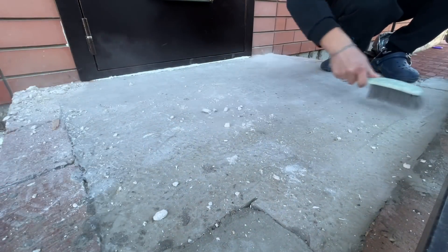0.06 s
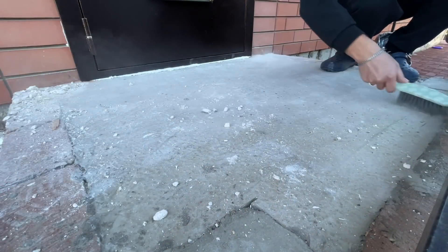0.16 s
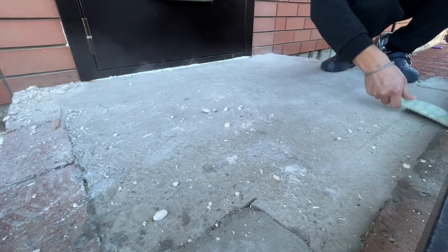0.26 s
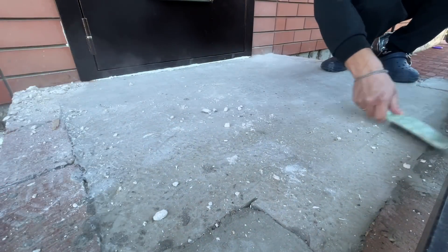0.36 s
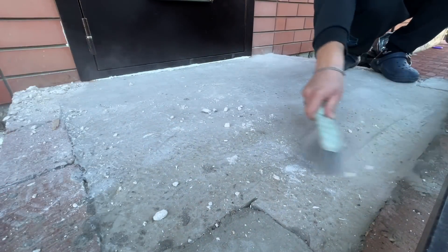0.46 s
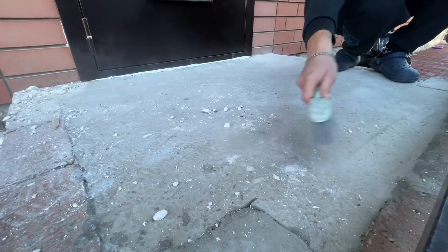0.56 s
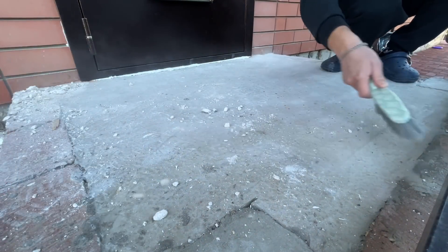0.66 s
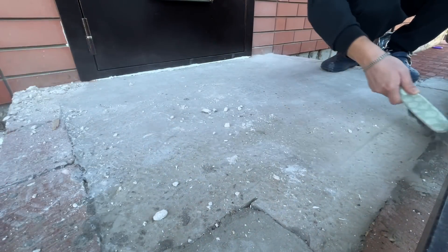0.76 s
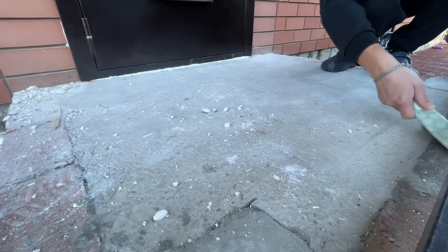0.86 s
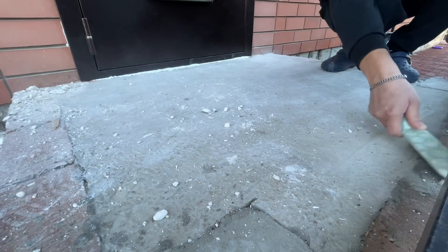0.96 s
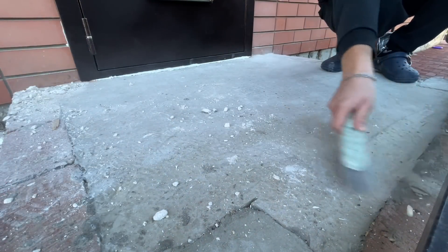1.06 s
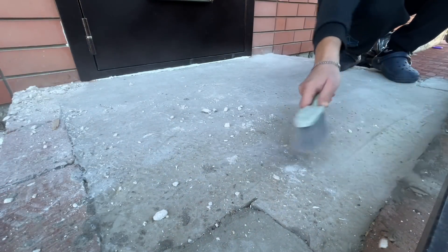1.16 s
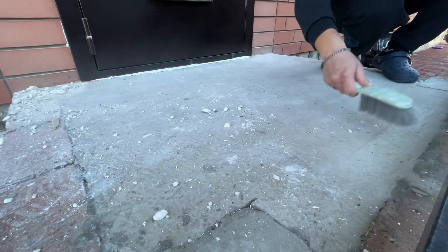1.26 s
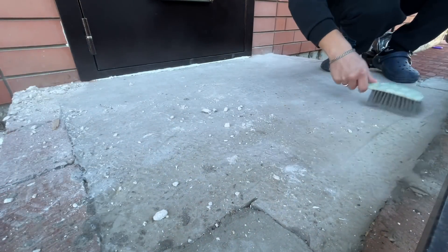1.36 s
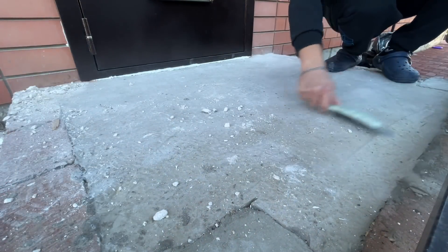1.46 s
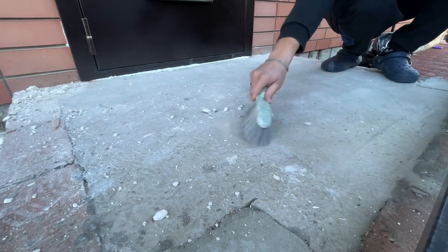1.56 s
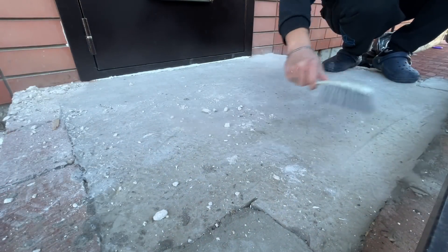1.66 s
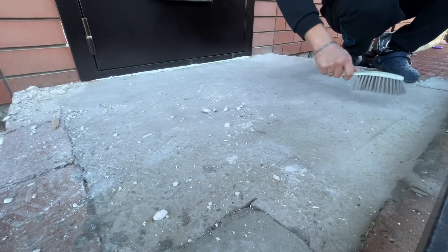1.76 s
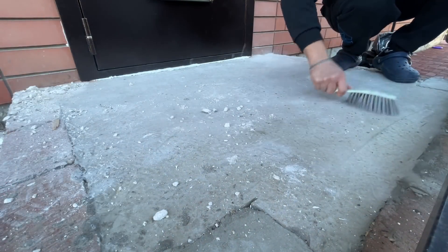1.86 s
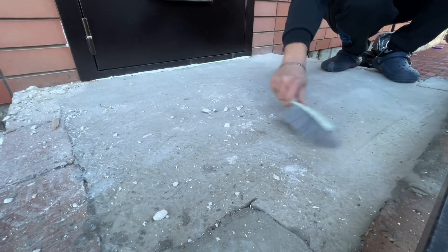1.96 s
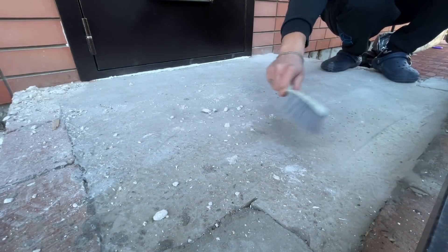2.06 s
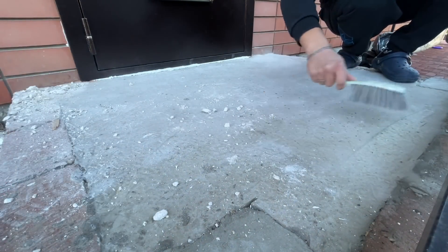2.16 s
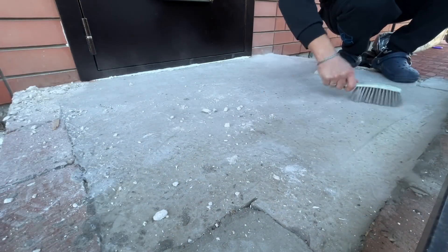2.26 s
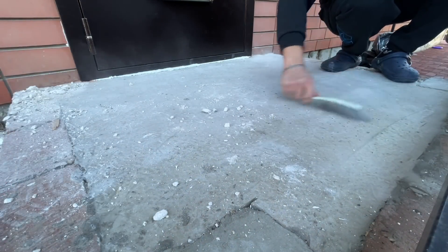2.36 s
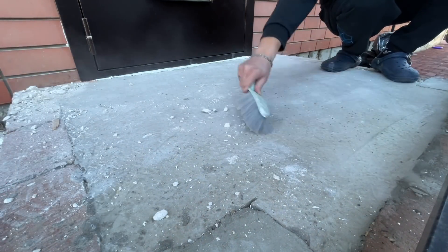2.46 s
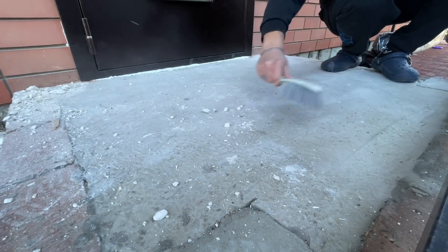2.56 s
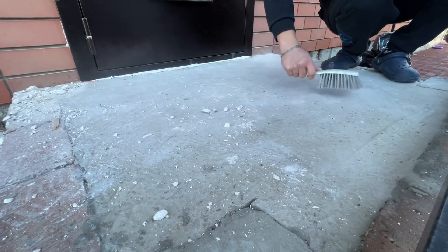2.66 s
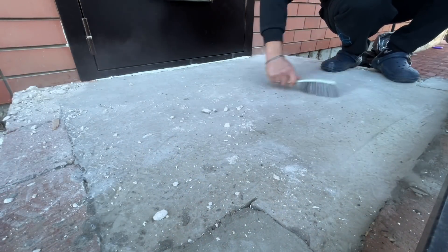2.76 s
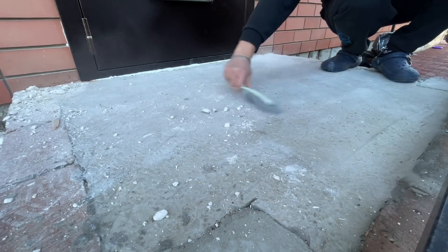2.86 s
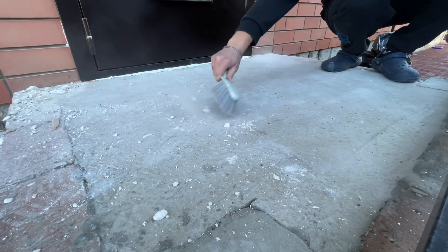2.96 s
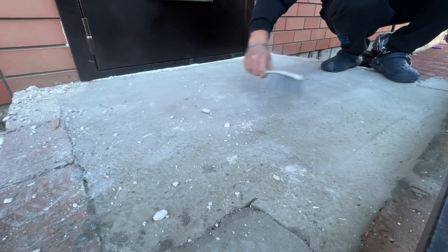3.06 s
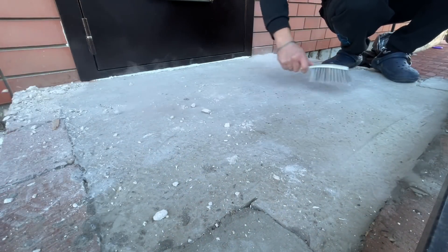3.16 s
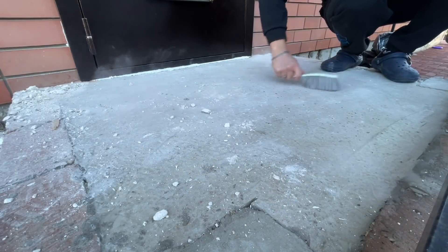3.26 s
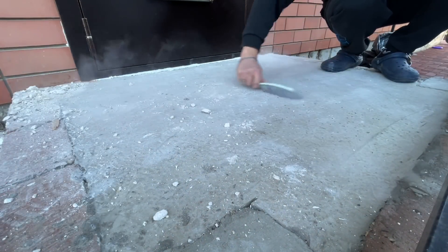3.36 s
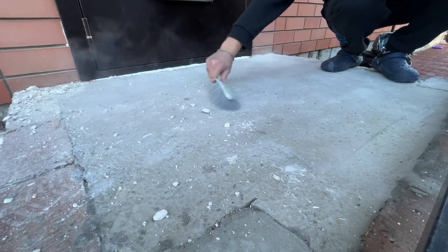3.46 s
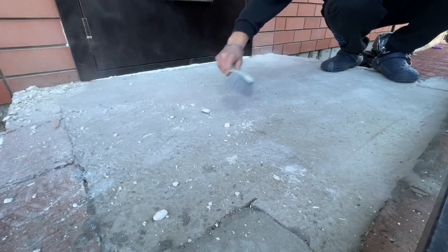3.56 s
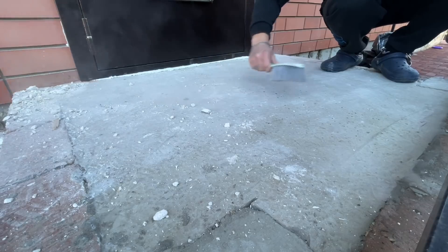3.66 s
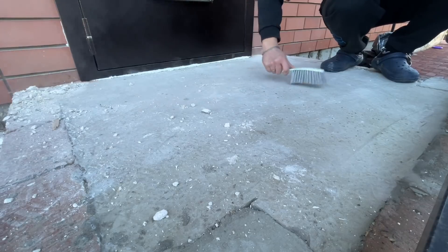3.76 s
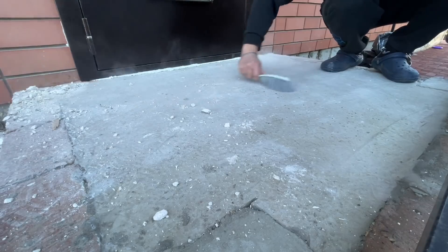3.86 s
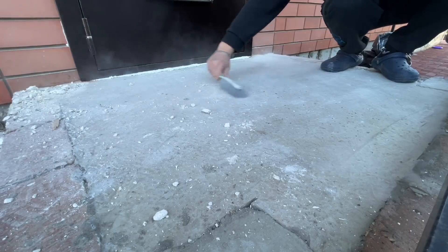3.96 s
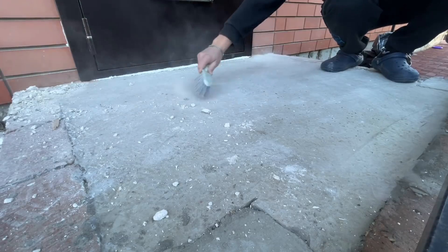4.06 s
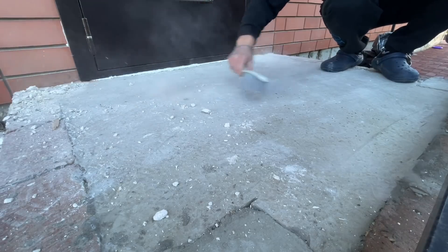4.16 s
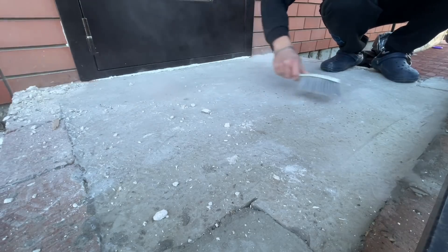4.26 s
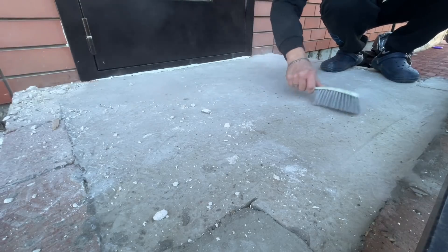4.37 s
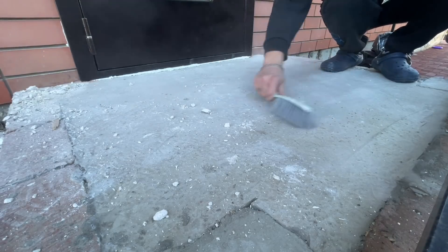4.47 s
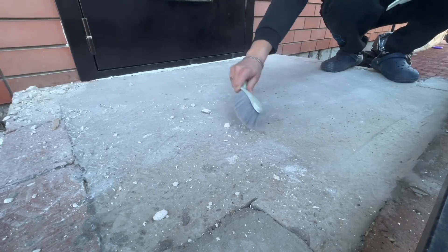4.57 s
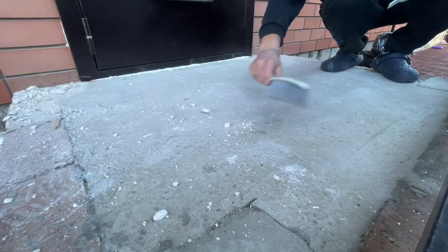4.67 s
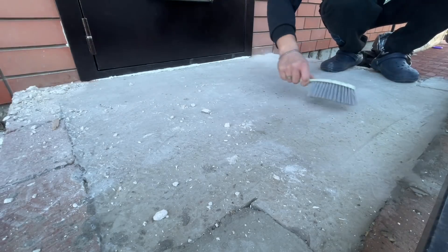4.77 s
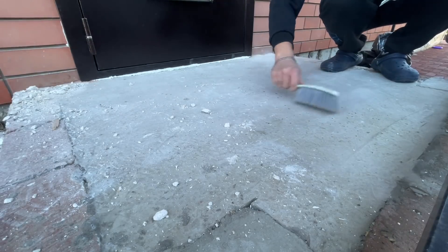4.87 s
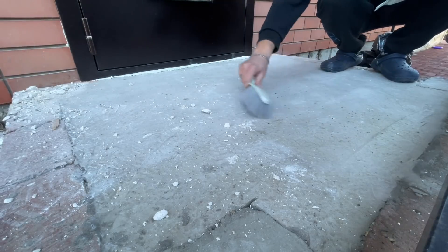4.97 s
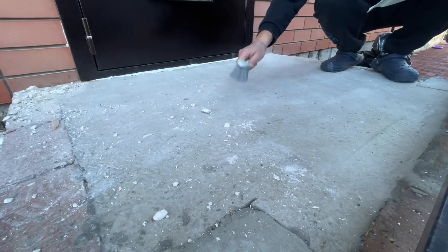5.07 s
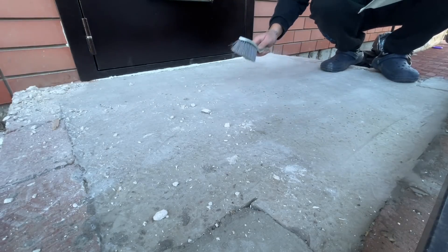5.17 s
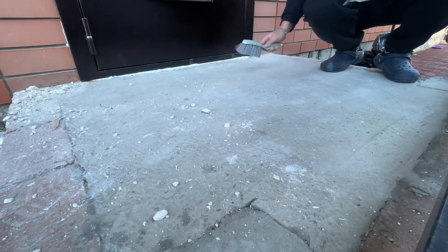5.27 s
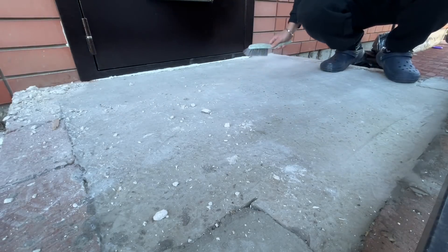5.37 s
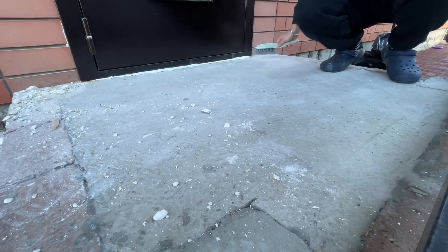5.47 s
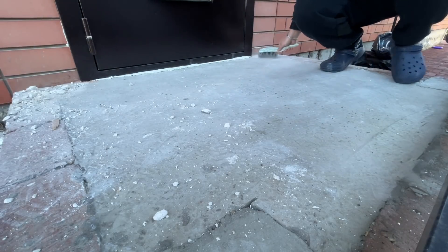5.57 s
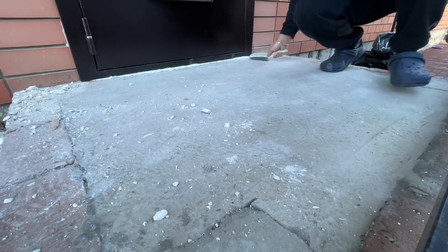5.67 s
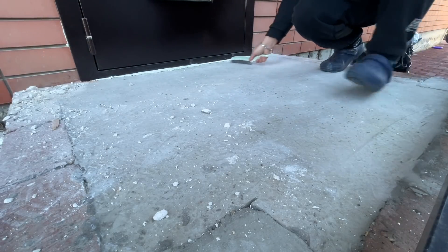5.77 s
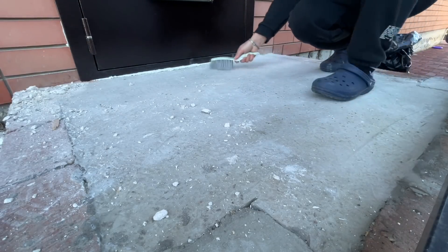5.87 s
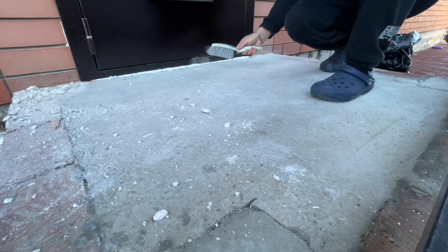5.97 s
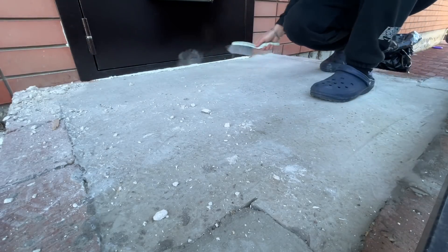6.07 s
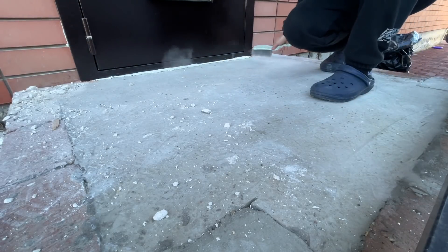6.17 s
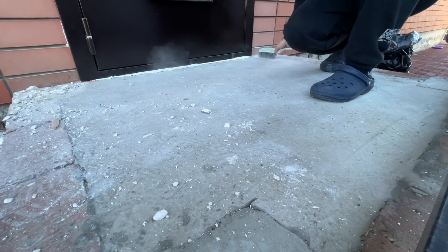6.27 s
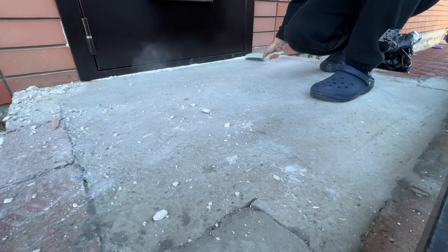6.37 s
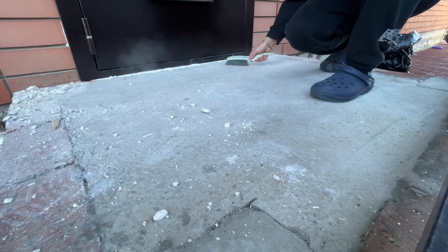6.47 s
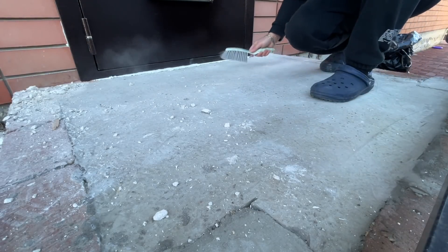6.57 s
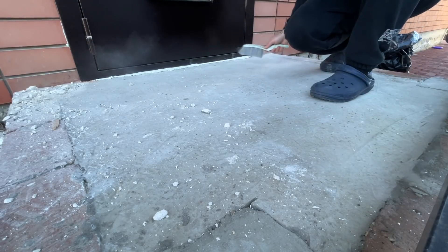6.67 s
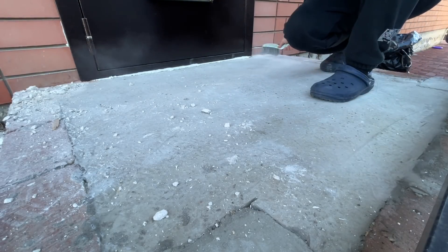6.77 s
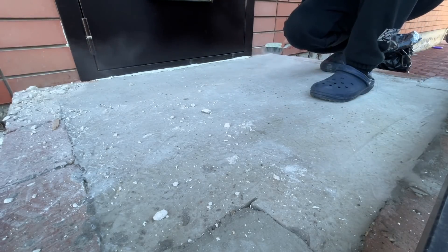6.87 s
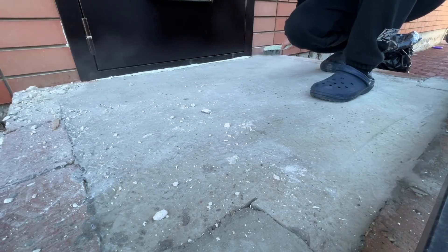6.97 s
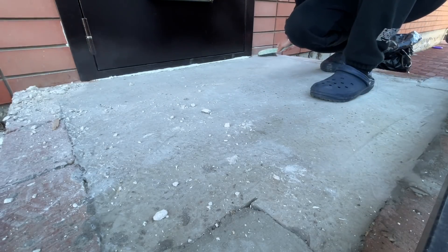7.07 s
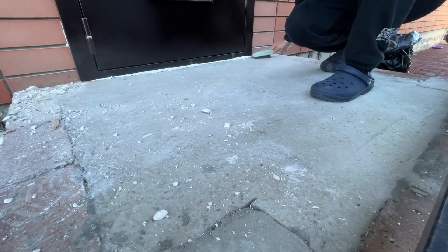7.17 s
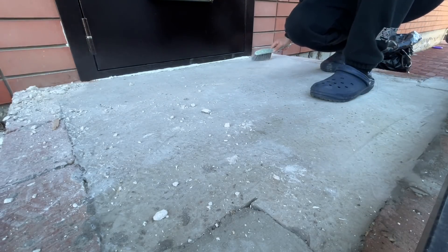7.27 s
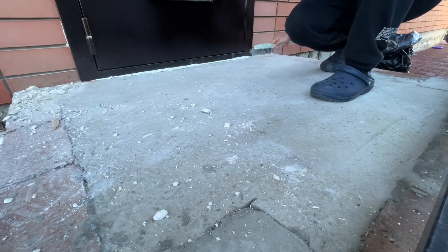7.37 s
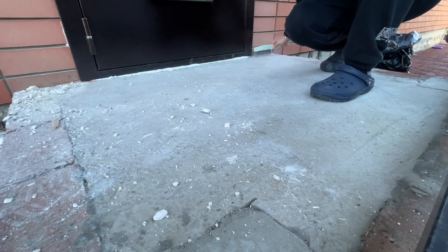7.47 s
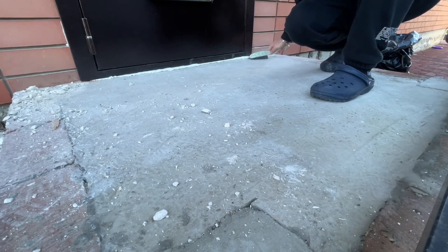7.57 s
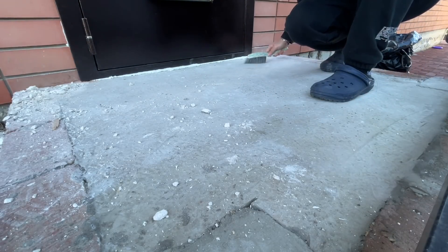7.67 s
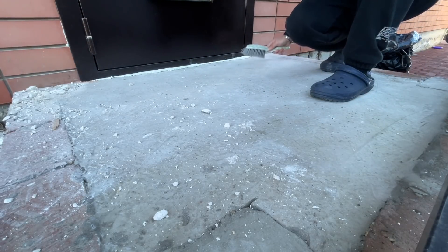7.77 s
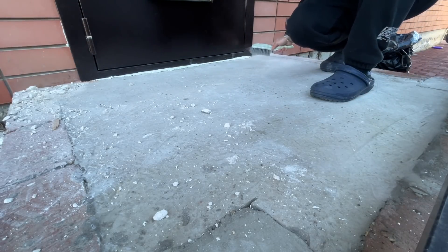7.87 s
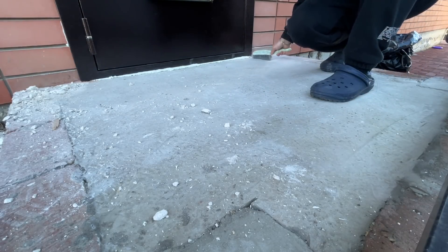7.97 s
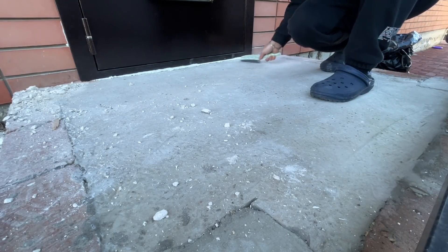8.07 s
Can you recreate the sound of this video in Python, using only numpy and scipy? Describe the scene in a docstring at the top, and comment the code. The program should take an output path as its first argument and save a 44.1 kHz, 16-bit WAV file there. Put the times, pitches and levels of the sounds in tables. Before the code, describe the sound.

Close, dry, bright swishes of a plastic hand brush on dusty concrete, roughly two per second, each landing with a light tap and small hollow knock. Fine grit ticks between strokes. After several firm strokes a shoe shifts softly, then the sweeping becomes fainter. Outdoor doorstep beside a door and brick wall, with a short close reflection, quiet low hum and distant rumble, picked up in stereo by a phone.

```python
"""Sweeping a concrete doorstep

A crouching person sweeps a dusty concrete doorstep with a plastic hand brush, about two strokes a second.
Each stroke lands with a tap made of fast-fading clicks and a knock in the modes of the handle. Dense random
clicks are the bristles flicking over the concrete, sparser ones the loose dust; short ringing ticks are grit.
A shoe shifts once. Door and brick wall answer with one close echo and a short tail, over a low hum and a
distant rumble, heard by a phone with two microphone ports."""
import sys
import numpy as np
from scipy import signal
from scipy.fft import rfft, irfft
from scipy.io import wavfile

SR = 44100
rng = np.random.default_rng(int(sys.argv[2]) if len(sys.argv) > 2 else 0)


def pcm_store(signal):
    """Save signal as 16-bit PCM."""
    levels = np.round(np.clip(np.atleast_2d(signal), -1, 1) * 32767)
    wavfile.write(sys.argv[1], SR, levels.astype(np.int16).T)


N = 358348
T = np.arange(N) / SR  # s
FREQ = np.maximum(np.arange(N // 2 + 1) * SR / N, 1)  # Hz


def undb(db):
    """Decibels to gain."""
    return 10 ** (np.asarray(db) / 20)


def unit(x):
    """Scale to rms 1."""
    return x / np.sqrt(np.mean(x ** 2))


def across(table, axis=1):
    """One column of a frequency table, joined on a log axis."""
    rows = np.array(table, float)
    return np.interp(np.log(FREQ), np.log(rows[:, 0]), rows[:, axis])


def curve(table):
    """Gain over time from rows of t/s, level/dB."""
    return undb(np.interp(T, *np.transpose(table)))


def shape(x, response):
    """Filter by a frequency response scaled to unit mean power."""
    scale = np.sqrt(np.mean(np.abs(response) ** 2))
    return irfft(rfft(x) * response / scale, N)


def resonance(hz, width):
    """Response of one damped mode, gain 1 at its centre."""
    return 1 / (1 + 1j * (FREQ ** 2 - hz ** 2) / (FREQ * width))


def band(x, hz, width):
    """Ring one resonance, gain 1 at the centre."""
    centre = min(hz, 0.4 * SR)
    b, a = signal.iirpeak(centre, hz / width, fs=SR)
    return signal.lfilter(b, a, x)


def noise():
    """Unrelated noise for each port."""
    return rng.standard_normal((2, N))


def walk(rate):
    """Smooth chance with spread 1, changing about rate times a second."""
    spectrum = rfft(rng.standard_normal(N))
    return unit(irfft(spectrum / (1 + (FREQ / rate) ** 4), N))


def flicks(rate, spread_db):
    """Random tiny clicks, rate a second; most are small, a few large."""
    sizes = undb(spread_db * np.minimum(rng.exponential(size=N), 4))
    struck = rng.random(N) < rate / SR
    return unit(struck * sizes * noise())


def fade(start, decay):
    """Envelope of a blow: sudden rise, exponential fall."""
    return (T >= start) * np.exp(-np.clip((T - start) / decay, 0, 50))


def swell(centre, length):
    """Bell-shaped envelope."""
    return np.exp(-np.minimum(((T - centre) / length) ** 2 / 2, 50))


def background():
    """A wavering low hum in the distant rumble of the neighbourhood."""
    # spectrum of the rumble: f/Hz, relative level/dB
    rumble_spectrum = [(27, -69), (33, -5.5), (39, 0.5), (48, -0.5), (60, -4.5), (80, -8), (120, -15.5),
                       (220, -19.5), (400, -25.5), (1100, -30), (2200, -40), (4000, -48.5), (14000, -53)]
    # the distant rumble dips briefly: t/s, level/dB
    rumble_level = [(.2, -49.5), (.65, -53.5), (1.15, -49.5), (3.5, -50.5)]
    rumble = shape(noise(), undb(across(rumble_spectrum))) * undb(0.34 * walk(4.5))
    hum_hz = 57.4 + 2.48 * walk(4.23)
    hum_db = -10  # against the rumble
    hum = np.sin(2 * np.pi * np.cumsum(hum_hz) / SR) * undb(2.0 * walk(9.8))
    return curve(rumble_level) * (rumble + undb(hum_db) * unit(hum))


def walls(x, t60, wet_db):
    """Door and brickwork scatter a short tail: fading noise that starts 15 ms behind the sound."""
    tail = (noise() * fade(0.015, t60 / np.log(1000)))[:, :SR]
    tail /= np.sqrt(np.sum(tail ** 2, axis=1, keepdims=True))
    return x + undb(wet_db) * signal.fftconvolve(x, tail, axes=1)[:, :N]


def door(x, share):
    """The echo off the door; its delay swings as the brush moves, combing the swish."""
    delay = np.abs(0.0036 + 0.00031 * walk(2))  # s
    echo = np.array([np.interp(T - delay, T, port) for port in x])
    return x + share * echo


def scuffs():
    """Short soft swells and a faint squeak, each in one resonance; the loudest is the shoe set down."""
    # t/s, half length/s, f/Hz, width/Hz, level/dB
    scuff_list = [(5.366, 0.055, 515, 637, -56.5), (5.854, 0.017, 242, 130, -44),
                  (5.868, 0.044, 587, 800, -50.5), (6.724, 0.024, 607, 500, -55.5),
                  (6.763, 0.022, 1060, 550, -59.5), (7.81, 0.024, 1068, 30, -62)]
    out = 0
    for s, length, hz, width, db in scuff_list:
        rubbing = shape(noise(), resonance(hz, width) ** 2)
        out = out + undb(db) * swell(s, length) * rubbing
    return out


def grit():
    """Each grain skipping on the concrete ticks sharply, then patters on faintly."""
    # t/s, relative level/dB, f/Hz
    grains = [(0.0452, -30, 8000), (0.143, -30, 9000), (0.606, -39.5, 5800), (0.633, -32.5, 10600),
              (0.689, -35, 6160), (0.719, -32.5, 8250), (1.6814, -33.5, 11300), (2.7051, -27, 8840),
              (3.05, -30.5, 7900), (3.115, -29, 8100), (3.17, -35, 6000), (3.204, -37, 11400),
              (3.249, -22.5, 11700), (3.641, -23.5, 11300), (4.103, -36, 11000), (4.2345, -33, 11200),
              (7.574, -26, 10000), (7.5864, -21.5, 10900)]
    out = 0
    for s, db, hz in grains:
        contact = fade(s, decay=0.0012)
        patter = undb(-12.0) * fade(s, decay=0.014)
        out = out + undb(db - 4.5) * band((contact + patter) * noise(), hz, 4300)
    return out


def handle():
    """Response of the plastic brush handle, a sum of damped modes."""
    # f/Hz, width/Hz, level/dB
    modes = [(900, 260, -1.5), (1480, 210, -1), (1796, 104, 6), (3676, 110, 1.5), (5820, 240, -4.5)]
    return sum(undb(db) * resonance(hz, width) for hz, width, db in modes)


def landings():
    """The tufts slap down within a few milliseconds, splay, and knock the handle."""
    # the brush lands: t/s, relative level/dB, knock of the handle against it/dB
    blows = [(0.1878, -37, -19.5), (0.757, -31.5, -17), (1.408, -33, -14.5), (1.8514, -35, -6.5),
             (2.2892, -26.5, -19.5), (2.7373, -26, -11), (3.2658, -27.5, -10.5), (3.808, -29, -13),
             (4.341, -32, -13.5), (4.8339, -30.5, -18.5), (4.905, -27, -15.5), (5.602, -36, -11.5),
             (5.616, -47, -5), (6.281, -47.5, -16), (6.8282, -46.5, -20), (6.975, -42.5, -18.5),
             (7.4585, -33.5, -17.5), (7.9647, -36, -16)]
    # spectrum of the slap: f/Hz, relative level/dB
    slap_spectrum = [(150, 8), (700, -6.5), (2500, -3), (4000, 9.5), (7000, 3.5), (11000, 1), (16000, -11)]
    slap, knock = 0, 0
    for s, db, knock_db in blows:
        slap = slap + undb(db) * (fade(s, decay=0.0043) + 0.31 * fade(s, decay=0.033))
        knock = knock + undb(db + knock_db) * fade(s, decay=0.025)
    tufts = flicks(rate=12000, spread_db=1.9)
    slapping = undb(-8.5) * shape(slap * tufts, undb(across(slap_spectrum)))
    return slapping + shape(knock * noise(), handle())


def progress(start, lift):
    """How far the push has come, 0 to 1."""
    return np.clip((T - start) / (lift - start), 0, 1)


def stroke(start, attack, lift, release, db, growth_db):
    """The tufts meet the floor, hiss louder as the brush gathers speed, then lift off; dust slides on."""
    contact = np.sin(np.pi / 2 * np.clip((T - start) / attack, 0, 1)) ** 2
    speed = undb(db - growth_db * (1 - progress(start, lift)))
    after = np.maximum(T - lift, 0)
    sliding = undb(-22)  # level of the sliding dust against the stroke
    settle_s = 0.099  # its decay time
    leaving = (1 - sliding) * swell(lift, release / np.sqrt(2)) + sliding * np.exp(-after / settle_s)
    return contact * speed * np.where(T < lift, 1, leaving)


def arm():
    """Strength of the hiss and of the rasp over time, stroke after stroke."""
    # faint rustles of sleeves and idle bristles: t/s, half length/s, relative level/dB
    rustles = [(0.07, .06, -46), (0.83, 0.042, -46), (1.224, 0.065, -57), (3.143, 0.02, -52),
               (5.36, 0.18, -53), (6.036, 0.089, -61.5), (6.89, .08, -62.5)]
    # start t/s, attack/s, lift t/s, release/s, relative hiss level at the lift/dB,
    # growth over the push/dB, rasp against hiss at the start/dB
    pushes = [(.186, .034, 0.47, 0.039, -20.5, 28.5, -14), (0.744, 0.021, 0.7653, 0.019, -26.5, 4, -14),
              (.8, 0.017, 1.081, .027, -21, 36, -12.5), (1.408, 0.03, 1.542, 0.039, -19.5, 14, -14.5),
              (1.851, 0.044, 1.957, 0.058, -19.5, 10.5, -13.5),
              (2.297, 0.069, 2.422, 0.062, -20.5, 5.5, -13), (2.746, 0.061, 2.927, 0.044, -22.5, 8.5, -14),
              (3.27, 0.044, 3.485, 0.048, -25, 6.5, -14), (3.8, .1, 4.011, 0.081, -28, 0.5, -11),
              (4.335, 0.16, 4.572, 0.05, -26.5, 1.5, -8.5), (4.88, 0.07, 4.964, 0.055, -25, 3, -6),
              (5.595, 0.13, 5.857, 0.064, -27.5, 13.5, -18), (6.315, 0.1, 6.49, 0.054, -31, 4, -31),
              (6.97, .069, 7.243, .045, -36.5, 22.5, -13), (7.47, 0.17, 7.708, 0.032, -35, 5.5, -12),
              (7.969, 0.12, 8.75, .03, -31.5, 7.5, -15.5)]
    # the hand presses hardest at first: the rasp sinks this much against the hiss over a push
    ease_db = 14.5
    hiss = sum(undb(db) * swell(s, length) for s, length, db in rustles)
    press = 0
    for start, attack, lift, release, db, growth_db, rasp_db in pushes:
        push = stroke(start, attack, lift, release, db, growth_db)
        hiss = hiss + push
        press = press + push * undb(rasp_db - ease_db * progress(start, lift))
    return hiss, press


def sweeping():
    """Bristle tips flick over the concrete; pressed hard, their shafts rasp; loose dust crackles along."""
    # spectrum of tips and dust: f/Hz, relative level/dB
    hiss_spectrum = [(200, -13.5), (1200, -16.5), (2400, -10.5), (3600, -1.5), (7000, -0.5), (9000, 2),
                     (16000, 2)]
    # spectrum of the shafts: f/Hz, relative level/dB
    rasp_spectrum = [(60, -8), (200, 3), (400, -11.5), (1100, -3), (1500, 3), (1900, -0.5), (2400, -0.5),
                     (3900, -3), (5000, 4), (16000, -45)]
    # each part of the doorstep favours one band: t/s, half length/s, f/Hz, width/Hz, level/dB
    places = [(.8, 1.56, 5610, 880, -1.5), (4.848, 0.33, 3800, 920, 0.5), (6.898, 1.17, 1670, 267, 13)]
    hiss, press = arm()
    hiss_response = undb(across(hiss_spectrum))
    # fine flicks, and now and then a bristle snapping off a coarse grain
    fine = flicks(rate=26000, spread_db=1.5)
    coarse = flicks(rate=700, spread_db=2.0)
    tips = shape(fine + 0.32 * coarse, hiss_response)
    # bristles of different free length take turns, so the colour wanders
    tips = tips + sum(0.35 * walk(10.6) * band(tips, hz, hz / 6) for hz in (3800, 5600, 7200))
    tips = tips + sum(undb(db) * swell(s, length) * band(tips, hz, width)
                      for s, length, hz, width, db in places)
    shafts = shape(flicks(rate=5000, spread_db=3.0), undb(across(rasp_spectrum)))
    shafts = shafts + undb(-7.5) * shape(noise(), handle())
    # tufts catch and let go on the rough surface
    catch = undb(1.02 * walk(25))
    # there is only so much loose dust: it stands out when the brush is light
    loose = hiss / (1 + hiss / undb(-50))
    dust = shape(flicks(rate=320, spread_db=2.0), hiss_response)
    bristles = catch * (undb(-6.5) * hiss * tips + undb(0.5) * press * shafts)
    return bristles + undb(-29.5) * loose * dust


def scene():
    """Brush, grit and shoe before the door and wall, over the hum."""
    brush = door(sweeping() + landings(), share=0.33)
    near = brush + grit() + scuffs()
    return walls(near, t60=0.12, wet_db=-15.5) + background()


def record(dry):
    """The ports ring near 11 kHz and share treble at a phase that varies with pitch; the top is cut."""
    # resonances of the two microphone ports: f/Hz, left level/dB, right level/dB
    ports = [(60, 2.5, -1), (380, 4.5, -1.5), (1460, 5, 2.5), (2690, 4, 0), (3970, 5, -0.5),
             (4720, 2.5, -3), (5510, 8.5, -5), (7060, 5, -3.5), (8460, 4.5, -1.5), (9320, 5, 7),
             (11010, 15.5, 13.5), (12220, -2, 0.5), (14200, -12, -13), (16000, -8.5, -19)]
    # f/Hz, correlation of the ports (0-1)
    correlation = [(50, 0.57), (180, 0.77), (500, 0.4), (1700, 0.13), (4000, 0.18), (7500, 0.42), (8800, 1),
                   (10000, 1), (11300, 0.98), (15500, 0.64)]
    # f/Hz, phase by which the left port leads/rad
    lead = [(100, 0), (1000, -2.4), (1800, .3), (4200, .4), (5400, -3), (6600, -6), (8100, -9.4),
            (8700, -12.5), (9800, -15.5), (10200, -15.8), (11000, -16.7), (12000, -18.8), (12400, -18.9),
            (13300, -21.9), (14300, -22.1), (15100, -25.1)]
    top_hz = 15900
    left, own = rfft(dry)
    likeness = np.clip(across(correlation), 0, 1)
    shared = likeness * left * np.exp(-1j * across(lead))
    right = shared + np.sqrt(1 - likeness ** 2) * own
    left_heard = left * undb(across(ports, axis=1))
    right_heard = right * undb(across(ports, axis=2))
    heard = irfft(np.array([left_heard, right_heard]), N)
    lowpass = signal.ellip(10, 0.2, 80, top_hz, fs=SR, output="sos")
    return signal.sosfilt(lowpass, heard)


dry = scene()
out = record(dry)
pcm_store(out)
```